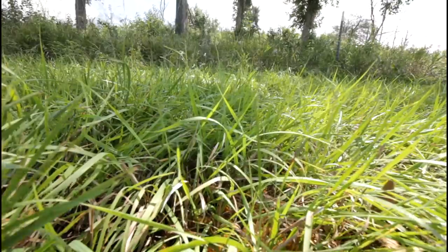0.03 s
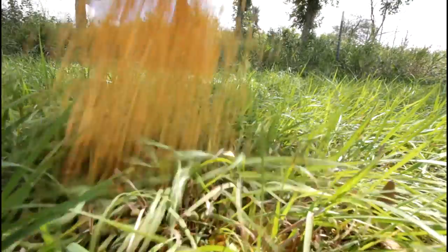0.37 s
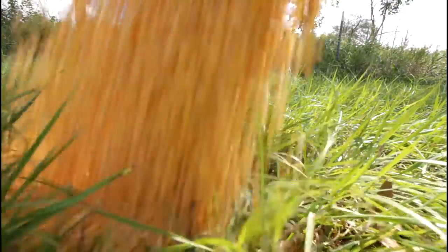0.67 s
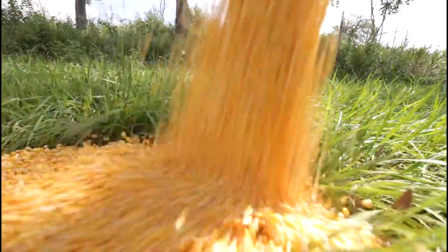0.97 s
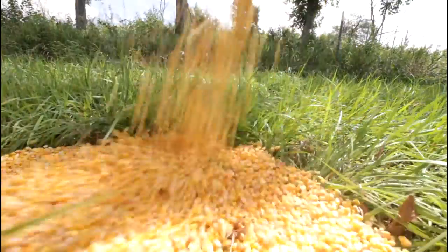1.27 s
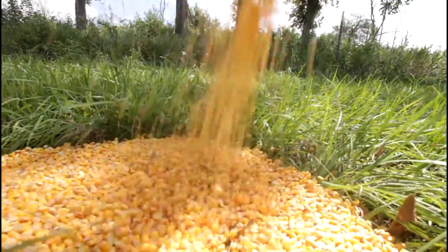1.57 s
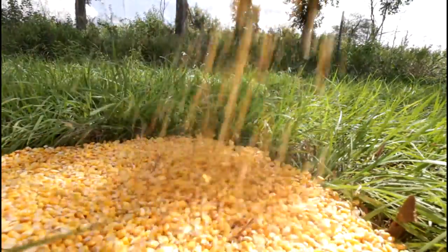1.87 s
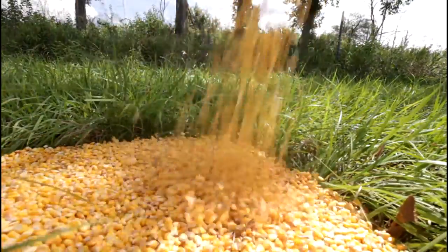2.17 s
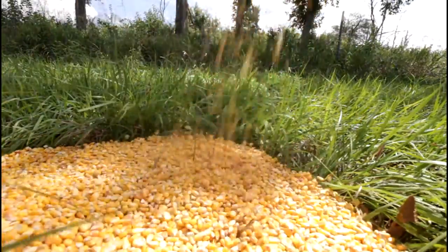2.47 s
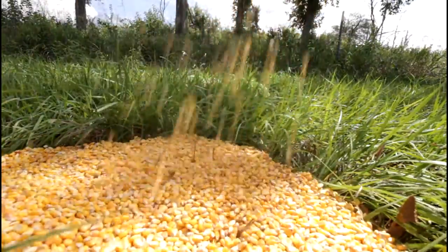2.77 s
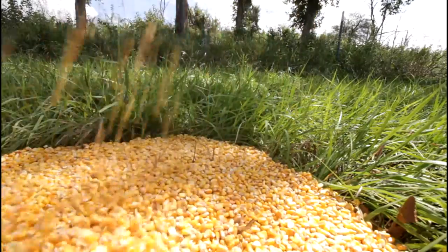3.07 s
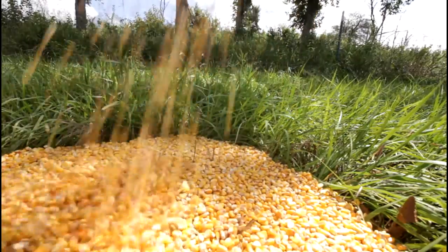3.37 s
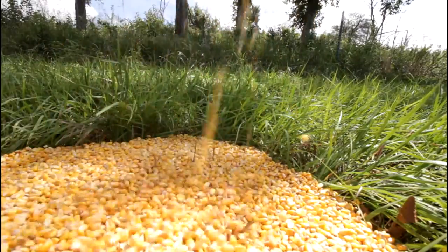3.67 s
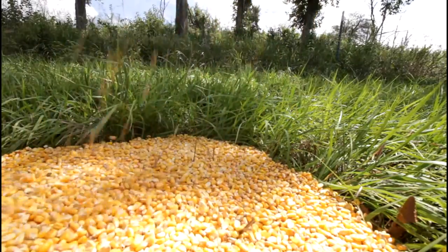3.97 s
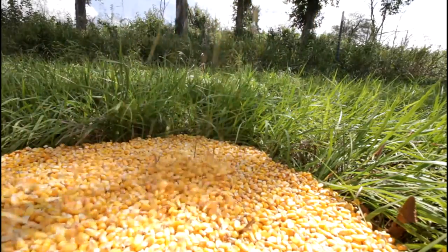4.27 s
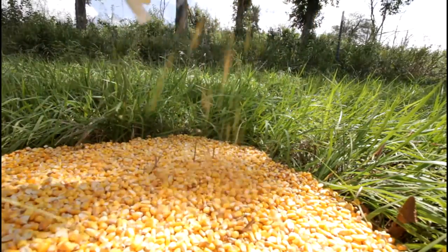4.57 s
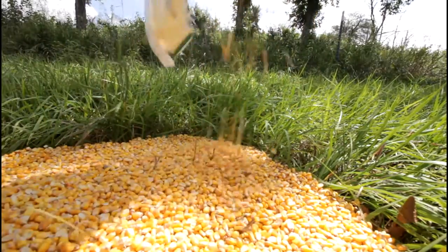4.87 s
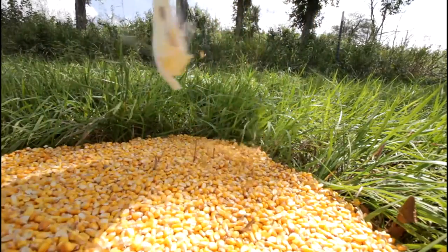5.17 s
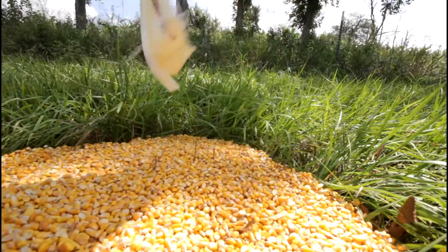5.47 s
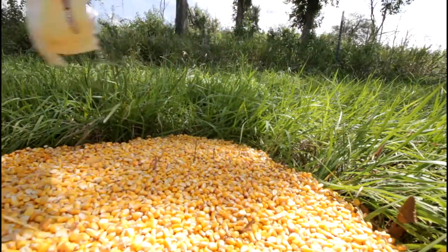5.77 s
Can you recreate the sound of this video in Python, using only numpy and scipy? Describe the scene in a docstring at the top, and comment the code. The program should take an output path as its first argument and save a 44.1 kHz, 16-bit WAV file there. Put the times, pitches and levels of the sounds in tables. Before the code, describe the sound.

Hard kernels rush down and clatter onto a heap outdoors, then trickle away while the emptied sack flaps and crinkles.

```python
"""Dry corn tipped from a sack onto grass

Kernels scrape over the sack wall, rush down and patter on the heap, right in front of a camera
on the ground; two strike its housing and ring its modes. The sack is then shaken out: it flaps
and crinkles while the last kernels tick down in clumps. Corn and sack sound as trains of small
impacts, each filtered by the response of the body that it excites."""
import sys
import numpy as np
from scipy import signal
from scipy.fft import rfft, irfft
from scipy.io import wavfile
from scipy.ndimage import uniform_filter1d, minimum_filter1d

SR = 44100
rng = np.random.default_rng(int(sys.argv[2]) if len(sys.argv) > 2 else 0)


def int16_out(signal):
    """Quantize to a 16-bit WAV file."""
    q = np.round(np.clip(np.atleast_2d(signal).T, -1, 1) * 32767)
    wavfile.write(sys.argv[1], SR, q.astype(np.int16))


N = 266408
TIME = np.arange(N) / SR

# spectrum of a kernel's click: f/Hz, level/dB
KERNEL_SPECTRUM = [(200, -38), (700, -15.5), (1200, -25.5), (2500, -10.5), (4000, -6.5), (6000, -3.5),
                   (9000, -1), (11500, -2), (14000, -3.5), (16000, -6)]
# spectrum of the slack sack wall: f/Hz, level/dB
EMPTY_SACK_SPECTRUM = [(60, -31.5), (170, -15), (350, -15), (570, -4.5), (790, -6), (980, -2.5),
                       (1140, -3.5), (1480, -8), (2000, -10.5), (2550, -8.5), (3300, -13), (5000, -16.5),
                       (8000, -26), (15000, -34.5)]


def undb(db):
    """Amplitude ratio of a level in decibels."""
    return 10 ** (np.asarray(db) / 20)


def curve(rows):
    """Linear interpolation in time between (t/s, value) rows."""
    return np.interp(TIME, *np.transpose(rows))


def gate(start, end, attack_s, release_s):
    """Envelope that rises exponentially to 1 at the start, holds, and decays after the end."""
    return np.exp(-np.maximum(start - TIME, 0) / attack_s - np.maximum(TIME - end, 0) / release_s)


def colour(x, spectrum, size=4096):
    """Convolution with a body's minimum-phase, unit-energy response, given as (f/Hz, level/dB) rows."""
    hz, db = np.transpose(spectrum)
    f = np.maximum(np.arange(size // 2 + 1) * SR / size, 1)
    cepstrum = irfft(np.log(undb(np.interp(np.log(f), np.log(hz), db))))
    cepstrum[1:size // 2] *= 2  # folding the cepstrum makes the response causal
    cepstrum[size // 2 + 1:] = 0
    response = irfft(np.exp(rfft(cepstrum)))
    return signal.fftconvolve(x, response / np.linalg.norm(response))[:N]


def resonate(x, hz, q):
    """Second-order resonance with unit gain at its centre."""
    return signal.lfilter(*signal.iirpeak(hz, q, SR), x)


def wander(rate):
    """Smooth random fluctuation of unit standard deviation."""
    step = max(int(SR / rate), 1)
    drift = uniform_filter1d(np.repeat(rng.standard_normal(N // step + 1), step), step)[:N]
    return drift / drift.std()


def clicks(rate, spread_db):
    """Poisson process: independent impulses of random size and sign, with unit mean power."""
    chance = np.minimum(rate / SR, 1)
    occurs = rng.random(N) < chance
    x = occurs * undb(spread_db * np.clip(rng.standard_normal(N), -2, 2)) * rng.choice([-1, 1], N)
    return x / np.sqrt(chance) / np.sqrt(np.mean(x ** 2 / chance))


def even(x, size):
    """Division by the running RMS steadies the level and keeps the fine grain."""
    return x / np.sqrt(uniform_filter1d(uniform_filter1d(x ** 2, size), size) + .02)


def impulses(rows):
    """One ideal impulse for each (t/s, level/dB) row."""
    x = np.zeros(N)
    for s, db in rows:
        x[int(s * SR)] += undb(db)
    return x


def scatter(hits, decay_s, share_db, rate=2600):
    """Secondary collisions: each hit sets off smaller contacts whose energy decays exponentially."""
    pole = np.exp(-1 / (decay_s * SR))
    energy = signal.lfilter([1 - pole], [1, -pole], hits ** 2 + 1e-18)
    contacts = clicks(rate, spread_db=2.0) + 0.49 * rng.standard_normal(N)
    return hits + undb(share_db) * np.sqrt(energy) * contacts


def air():
    """Ambient noise: a faint broadband breeze and a narrow band of distant insects."""
    # spectrum of the open air: f/Hz, level/dB
    breeze_spectrum = [(25, -21), (70, -2), (140, 0), (350, -7), (600, -5), (1100, -7), (2100, -45.5),
                       (2900, -25.5), (4000, -22), (9000, -26.5), (15000, -30)]
    breeze = undb(-62.5 + 1.5 * wander(6.6)) * colour(rng.standard_normal(N), breeze_spectrum)
    insects = resonate(resonate(rng.standard_normal(N), hz=8000, q=10), hz=8000, q=10)
    return breeze + undb(-76 + wander(12)) * insects / insects.std()


def slide_db():
    """Level envelope of the friction in the sack."""
    # corn sliding in the first and second pour, then the emptied sack stirring: t/s, level/dB
    first_slide = [(0.0, -45.5), (0.09, -37.5), (0.56, -38.5), (1.0, -32.5), (1.12, -34.5), (1.37, -30),
                   (1.53, -36), (1.76, -28.5), (1.85, -32.5), (2.56, -41), (2.66, -39), (2.85, -40.5),
                   (2.86, -41), (2.9, -51)]
    second_slide = [(2.95, -46.5), (3.354, -40), (3.61, -49), (3.69, -49)]
    stir = [(3.87, -56.5), (4.05, -48), (4.45, -48.5), (5.13, -48.5), (5.25, -61), (5.52, -60.5),
            (5.72, -50), (5.83, -60.5), (6.04, -58.5)]
    return curve(np.vstack([first_slide, second_slide, stir]))


def sliding():
    """Friction: tiny scrapes excite the sack wall, turning grainy and papery as the load runs out."""
    # spectrum of the loaded sack wall: f/Hz, level/dB
    full_sack_spectrum = [(60, -32), (170, -13), (320, -5.5), (480, 0.5), (630, 3.5), (820, -5),
                          (1080, -0.5), (1600, -3.5), (2500, -5), (4000, -11), (8000, -17.5),
                          (15000, -26.5)]
    scrapes_per_s = np.interp(TIME, [.5, 1.6, 3.0, 3.8], [9060, 3300, 940, 377])
    slack = np.interp(TIME, [.9, 1.3, 3.0, 4.2], [0.084, 0.5, 0.26, 0.51])
    rustle = 0
    for power_share, wall in ((1 - slack, full_sack_spectrum), (slack, EMPTY_SACK_SPECTRUM)):
        scrapes = scatter(clicks(scrapes_per_s, spread_db=6.0), decay_s=.0015, share_db=-1.5)
        rustle = rustle + np.sqrt(power_share) * colour(even(scrapes, size=2000), wall)
    return rustle * undb(slide_db() + 0.85 * wander(35) + 1.28)


def creases():
    """Buckling: a fold snaps over and the wall around it crackles briefly."""
    # loud folds snapping: t/s, level/dB
    loud_folds = [(0.268, -19), (1.187, -9.5), (1.5, -12.5), (2.368, -20.5), (3.075, -21), (3.172, -25),
                  (3.436, -17), (3.819, -26.5), (3.941, -30), (4.089, -23.5), (4.1575, -14.5),
                  (4.312, -18.5), (4.366, -23.5), (4.416, -18.5), (5.177, -19.5), (5.233, -28.5),
                  (5.279, -24.5), (5.314, -35), (5.449, -28.5), (5.557, -26.5), (5.579, -27.5),
                  (5.651, -15), (5.657, -20.5), (5.724, -26)]
    # spectrum of a snap: f/Hz, level/dB
    snap_spectrum = [(100, -41), (350, -21.5), (590, 2), (800, -1), (1100, 5.5), (1800, -1), (2550, 3),
                     (3600, -3), (5000, -9), (7000, -28.5), (15000, -35)]
    lifting = np.abs(TIME - 5.69) < .1  # small folds crinkle as the empty sack is lifted away
    folds_per_s = 60 * lifting
    small_folds = (rng.random(N) < folds_per_s / SR) * undb(-36 + 2.8 * rng.standard_normal(N))
    snaps = scatter(impulses(loud_folds) + small_folds, decay_s=.0026, share_db=4, rate=7000)
    return undb(3.5) * colour(snaps, snap_spectrum)


def stream():
    """Amplitude envelope of the granular flow: two pours, then a trickle with loose handfuls."""
    # clatter of the big pour, the second tip and the trickle that peters out: t/s, level/dB
    first_pour = [(0.3, -54.5), (0.35, -48), (0.4, -31), (0.49, -25), (0.73, -19.5), (1.45, -34.5),
                  (1.75, -34), (1.99, -37.5), (2.17, -32.5), (2.38, -40.5), (2.72, -45), (2.9, -41.5)]
    second_pour = [(2.93, -41), (2.938, -47), (2.97, -33.5), (3.158, -37), (3.424, -33), (3.696, -42.5),
                   (3.7, -43.5)]
    trickle = [(3.7, -51.5), (5.25, -57.5), (5.42, -67), (5.5, -87)]
    # handfuls shaken loose: start t/s, duration/s, level/dB
    handfuls = [(3.795, 0.03, -44.5), (3.864, 0.058, -41), (3.963, 0.075, -44.5), (4.059, .108, -44),
                (4.2, .134, -41), (4.362, 0.24, -46), (4.616, 0.24, -43.5), (4.877, 0.15, -45),
                (5.033, 0.065, -45), (5.112, .135, -52.5), (5.34, .07, -57.5)]
    pours = np.vstack([first_pour, second_pour])
    fall = undb(curve(pours)) * gate(pours[0, 0], pours[-1, 0], attack_s=.08, release_s=0.11)
    fall = np.maximum(fall, undb(curve(trickle)) * (TIME > trickle[0][0]))
    for start, length, db in handfuls:
        sag_db = 2.5 * (np.clip((TIME - start) / length, 0, 1) - .5)  # each thins out as it lands
        handful = undb(db - sag_db) * gate(start, start + length, attack_s=.004, release_s=0.0085)
        fall = np.maximum(fall, handful)
    return fall


def falling_corn():
    """Shot noise: kernels click on the heap and jostle their neighbours; the heap thuds softly."""
    # the last corn falls as fewer, harder hits: t/s, factor on the kernel rate
    thinning = [(2.3, 1.9), (3.0, 0.79)]
    # spectrum of the heap's thud: f/Hz, level/dB
    heap_spectrum = [(25, -35.5), (60, -13), (110, -2), (180, 1), (300, -1), (500, 1.5), (900, -12),
                     (3000, -50)]
    reference_db, db_per_decade = -40, 13.5  # a louder stream is a denser one
    fall = stream()
    kernels_per_s = (170 + 1100 * (fall / undb(reference_db)) ** (20 / db_per_decade)) * curve(thinning)
    clumps = undb(np.minimum((450 / kernels_per_s) ** 0.7, 1) * wander(110))  # a thin stream clumps
    clatter, landings = 0, 0
    for hz in (6000, 9500, 13500):  # broad faces click lower, hard tips higher
        hits = clicks(kernels_per_s / 3, spread_db=5.5) * clumps
        shower = scatter(hits, decay_s=.0016, share_db=-3)
        clatter = clatter + shower + undb(-4.5) * resonate(shower, hz, q=2.1)
        landings = landings + hits
    clatter = colour(even(clatter, size=1800), KERNEL_SPECTRUM)
    thud = colour(even(scatter(landings, decay_s=.012, share_db=13.0), size=1500), heap_spectrum)
    # the thud grows with the moving corn, up to a limit: a full stream lands on loose, sliding kernels
    thud_db = np.minimum(-52.5 + 0.71 * (slide_db() - reference_db), -51.5)
    cushion_db = -9 * gate(0.42, .85, attack_s=0.092, release_s=.1)  # grass cushions until it is buried
    return clatter * fall * undb(1.5) + thud * undb(thud_db + cushion_db)


def near_kernels():
    """Impact sound: the brief contact of a lone kernel landing close by gives a dry, broadband tick."""
    # single landings: t/s, level/dB
    landings = [(1.9475, -8.5), (2.7554, -24), (2.8946, -17), (2.9482, -20), (2.998, -19), (3.2111, -13),
                (3.5965, -16.5), (3.831, -18), (3.87, -26), (3.92, -22.5), (3.972, -13.5), (3.984, -17),
                (4.0615, -16.5), (4.3136, -17), (4.3331, -13.5), (4.517, -19), (5.0667, -20), (5.2325, -33),
                (5.3828, -30), (5.4111, -32), (5.4848, -33), (5.4994, -21.5), (5.8142, -29.5)]
    ticks = scatter(impulses(landings), decay_s=.0005, share_db=-5, rate=12000)
    return undb(4.5) * colour(ticks, KERNEL_SPECTRUM)


def housing_knocks(size=6000):
    """Modal ringing: a kernel cracks against the camera's stiff shell and nudges the whole body."""
    # kernel strikes: t/s, level/dB, contact time/s, factor on the decay time
    strikes = [(3.7193, -6.5, 0.000011, 1), (3.7738, 2.5, .00004, 0.96)]
    # modes of the shell: f/Hz, level/dB, T60/s
    modes = [(1400, -41.5, 0.044), (2518, -26.5, 0.059), (2820, -19.5, 0.01), (3586, -21.5, 0.023),
             (4410, -20.5, 0.023), (4800, -7.5, 0.0067), (5130, -13.5, 0.015), (5870, 1.5, 0.0048),
             (6330, -13, 0.017), (6550, 2.5, 0.0056), (7190, -10.5, 0.015), (7820, -13, 0.012),
             (8940, -23, 0.02), (9300, -1.5, 0.0044), (10800, 1, 0.0041), (12400, -11, 0.0059),
             (13380, -21.5, 0.0062), (14300, -5, 0.0043)]
    knocks, t = np.zeros(N), np.arange(size) / SR
    onset = 1 - np.exp(-t / 0.00027)
    nudge = undb(-45.5) * np.exp(-t / .0012)
    for s, db, contact_s, stretch in strikes:
        ring = sum(undb(mode_db - 60 * t / (t60 * stretch)) * np.sin(2 * np.pi * (hz * t + rng.random()))
                   for hz, mode_db, t60 in modes)
        burst = undb(-10) * rng.standard_normal(size) * np.exp(-t / .0018)
        crack = resonate(burst, hz=6800, q=0.72)
        pole = np.exp(-1 / (contact_s * SR))  # a longer contact is duller
        blow = signal.lfilter([1 - pole], [1, -pole], (ring + crack) * onset)
        start = int(s * SR)
        knocks[start:start + size] += undb(db + 11.0) * (blow + nudge)
    return knocks


def shaking():
    """Cavity resonance: each flap is a swell of crumpling that also rings the air inside the sack."""
    # flaps: peak t/s, level/dB, half width/s, relative level of the cavity ring/dB
    flaps = [(3.966, -40.5, 0.014, -18), (4.099, -31.5, 0.011, -18), (4.145, -35, 0.0041, -18),
             (4.283, -30, 0.017, -2), (4.424, -32, 0.017, -16), (4.557, -35.5, 0.018, -9),
             (4.688, -35, 0.02, -20), (4.821, -35, 0.0087, -8), (4.959, -37, 0.0083, 8),
             (5.072, -37, 0.0049, -17), (5.126, -39, 0.011, -24), (5.169, -44, 0.017, -18),
             (5.284, -37, 0.003, -14), (5.678, -32.5, 0.011, 7), (5.9, -49, 0.027, -1)]
    # the cavity rings lower once the sack hangs open: t/s, f/Hz
    cavity = [(5.3, 1110), (5.6, 550)]
    crackle = scatter(clicks(2200, spread_db=2.5), decay_s=0.00083, share_db=-1)
    crumple = colour(even(crackle, size=600), EMPTY_SACK_SPECTRUM)
    flapping = 0
    for s, db, width, ring_db in flaps:
        swell = np.exp(1 - np.hypot(1, 2 * (TIME - s) / width) ** 0.72)
        flap = crumple * undb(db) * swell
        cavity_hz = np.interp(s, *np.transpose(cavity))
        flapping = flapping + flap + undb(ring_db) * resonate(flap, cavity_hz, q=5)
    return flapping


def scene():
    """Superposition in a free field: all sounds add at one microphone, and the meadow gives no echo."""
    mono = falling_corn() + near_kernels() + sliding() + shaking() + creases() + housing_knocks() + air()
    return np.array([mono, mono])


def record(dry):
    """Peak and band limiting: a fast limiter holds the knocks near full scale; a low-pass cuts the top."""
    needed_gain = 1 / np.maximum(np.abs(dry), 1)
    gain = uniform_filter1d(minimum_filter1d(needed_gain, size=15), size=15)
    cutoff_hz = 15850
    return signal.sosfilt(signal.ellip(10, .2, 70, cutoff_hz, fs=SR, output="sos"), dry * gain)


dry = scene()
out = record(dry)
int16_out(out)
```